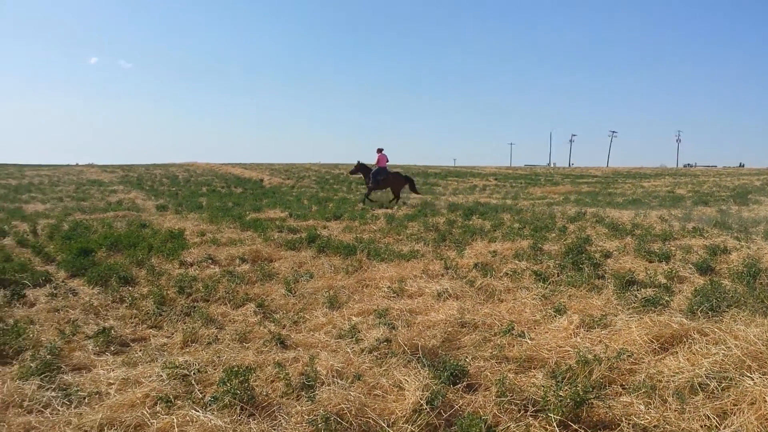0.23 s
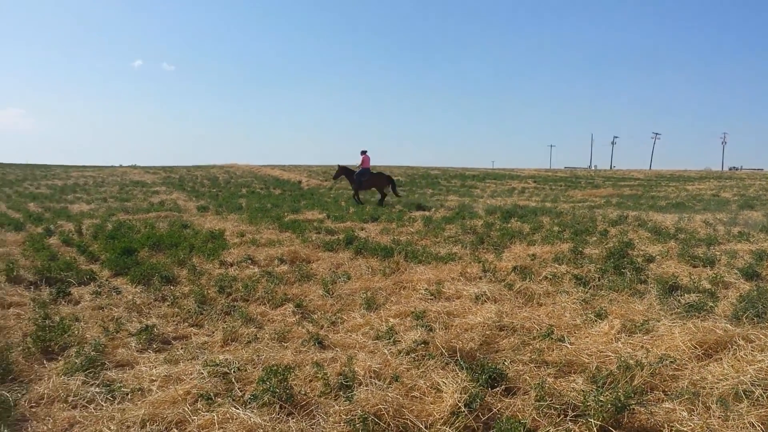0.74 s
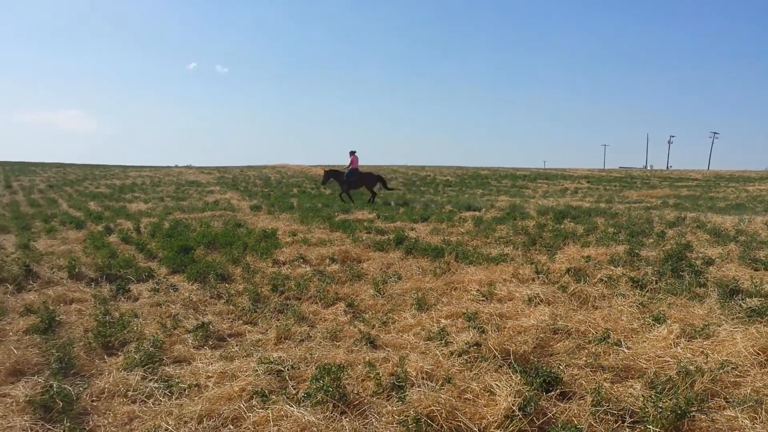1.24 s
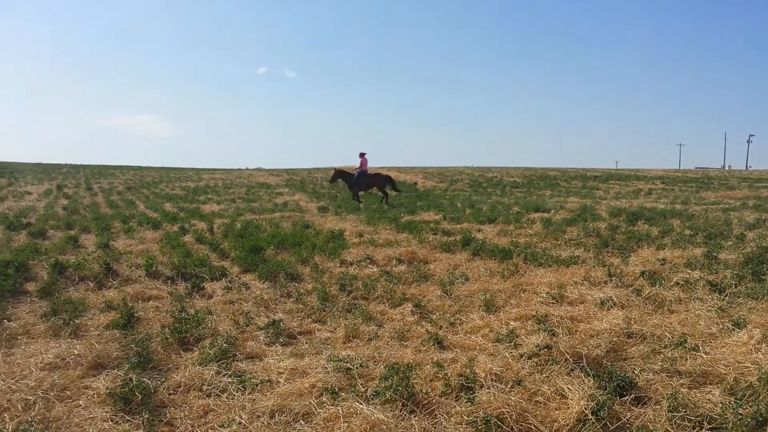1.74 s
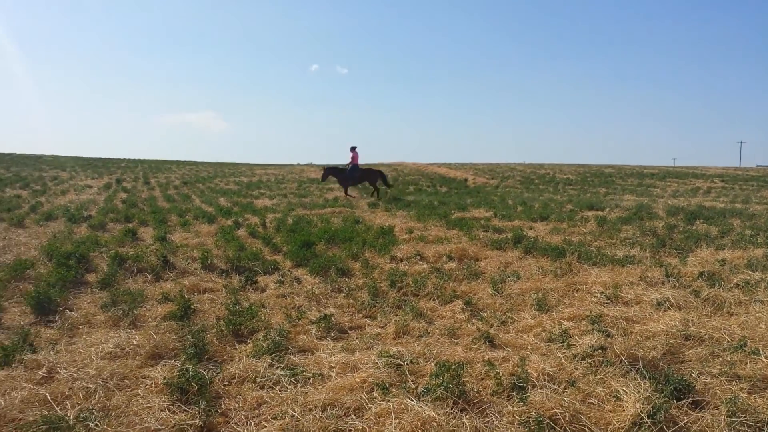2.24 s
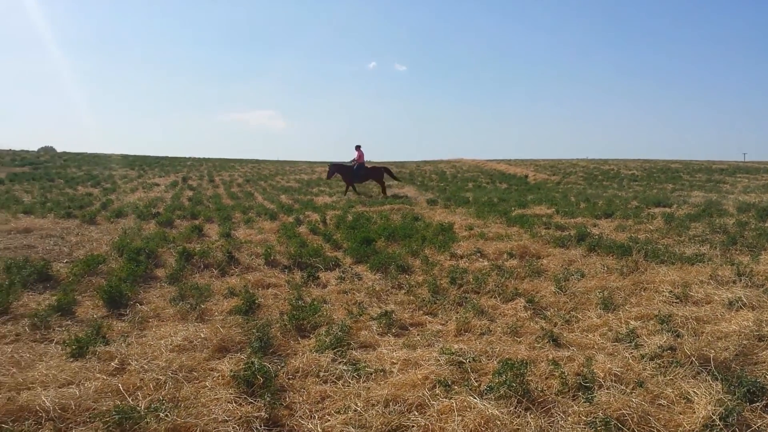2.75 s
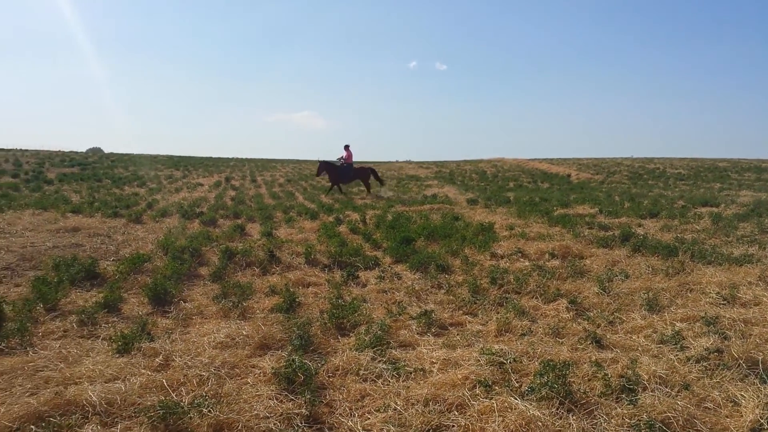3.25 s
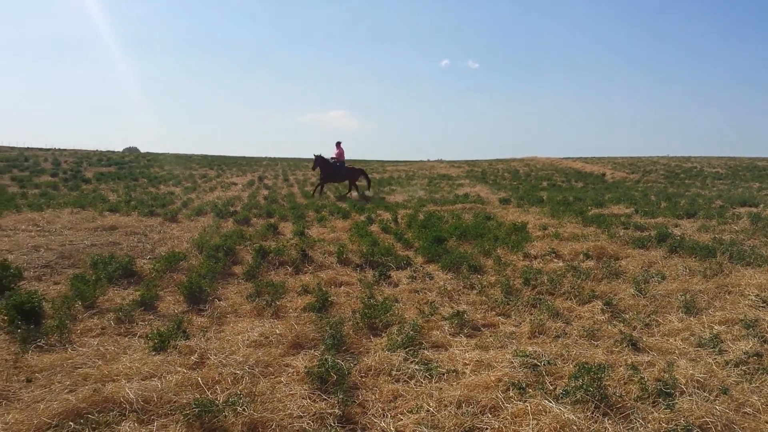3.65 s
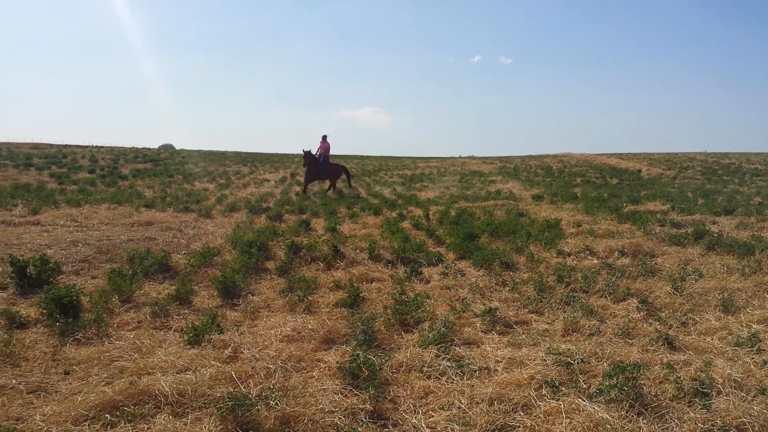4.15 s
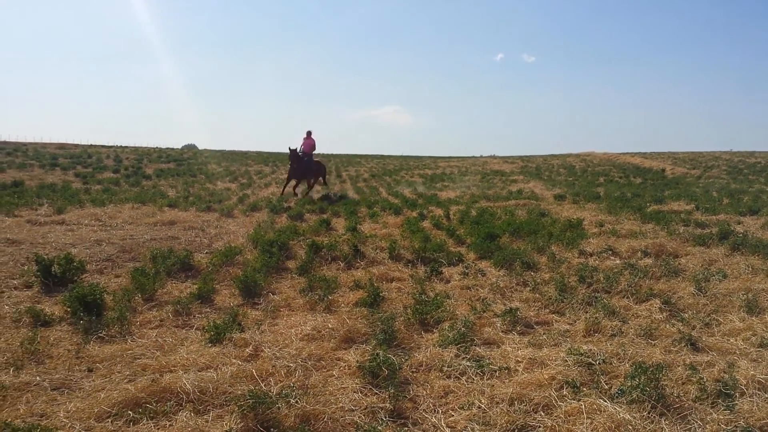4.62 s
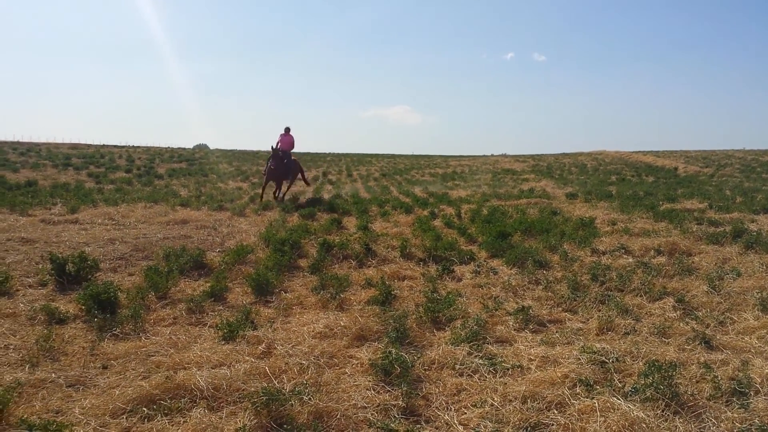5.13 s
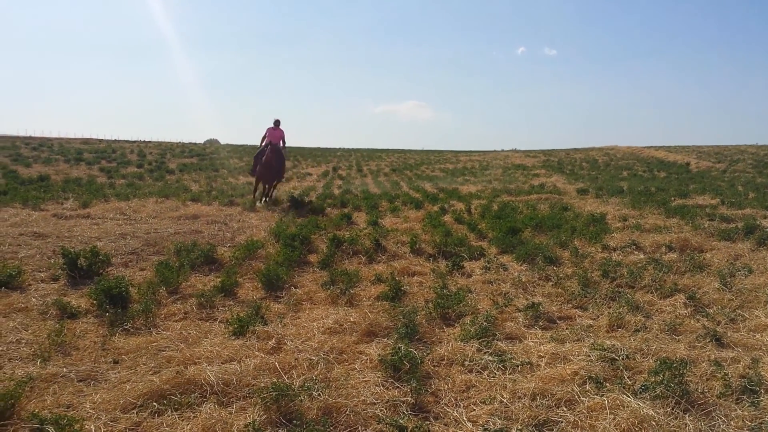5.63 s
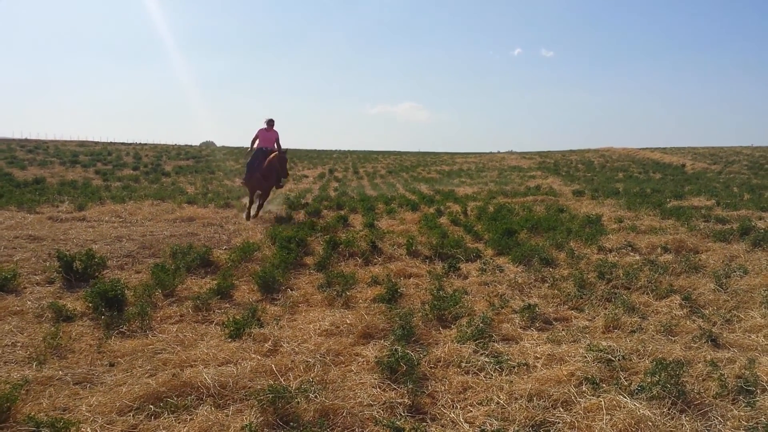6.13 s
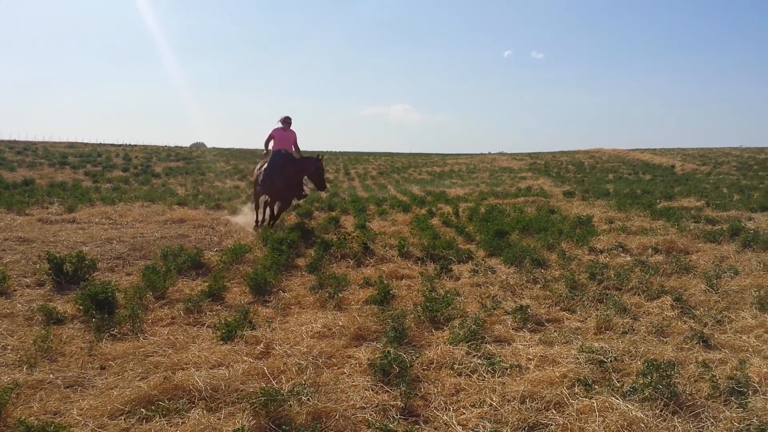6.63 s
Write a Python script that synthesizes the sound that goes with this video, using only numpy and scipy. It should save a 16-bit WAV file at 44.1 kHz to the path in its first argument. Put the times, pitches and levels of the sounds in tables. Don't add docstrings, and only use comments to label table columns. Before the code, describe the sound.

A horse canters through dry stubble, legs swishing and stalks crackling, snorting rhythmically each stride while wind buffets the microphone with low thuds.

```python
import sys
import numpy as np
from scipy import signal
from scipy.fft import rfft, irfft, next_fast_len
from scipy.io import wavfile
from scipy.ndimage import uniform_filter1d, map_coordinates

SR = 44100
rng = np.random.default_rng(int(sys.argv[2]) if len(sys.argv) > 2 else 0)


def unload_wav(signal):
    wavfile.write(
        sys.argv[1],
        SR,
        np.round(np.clip(np.atleast_2d(signal).T, -1, 1) * 32767).astype(np.int16),
    )


def field_ratio(decibels):
    return 10 ** (np.asarray(decibels, dtype=float) / 20)


N = 303496
T = np.arange(N) / SR
LONG = next_fast_len(N)
HZ = np.fft.rfftfreq(LONG, 1 / SR)

# (time [s], share head-on [0-1], lag of the left port [samples])
TURN = [
    (0, 0, 0.96),
    (3.5, 0.04, 1.7),
    (4.7, 0.61, 1.94),
    (5.05, 0.92, 1.7),
    (6.88, 1, 1.5),
]


def unit(x):
    return x / np.sqrt(np.mean(x ** 2))


def curves(rows):
    s, *columns = np.transpose(rows)
    return [np.interp(T, s, column) for column in columns]


def on_hz(hz, values):
    return np.interp(np.log(HZ + 1), np.log(hz), values)


def colour(x, hz, db):
    return irfft(rfft(x, LONG) * field_ratio(on_hz(hz, db)), LONG)[:N]


def band(x, hz, width):
    b, a = signal.iirpeak(hz, hz / width, SR)
    once = signal.lfilter(b, a, x)
    return signal.lfilter(b, a, once)


def walk(rate):
    hold = int(SR / rate)
    held = np.repeat(rng.standard_normal(N // hold + 1), hold)
    slewed = uniform_filter1d(uniform_filter1d(held, hold), hold)
    return 1.92 * slewed[:N]


def add(track, s, piece):
    i = max(int(s * SR), 0)
    track[i:i + len(piece)] += piece[:N - i]


def pops(rows):
    out = np.zeros(N)
    leans = rng.uniform(-1.74, 1, len(rows))
    for (s, db, hz, *edge_db), lean in zip(rows, leans):
        cycle = np.arange(-2 * SR / hz, 2 * SR / hz) * hz / SR
        pulse = np.exp(-(cycle / 0.52) ** 2) * np.cos(2 * np.pi * cycle + 0.95 * lean)
        if edge_db:
            u = cycle / hz
            edge = np.exp(-(u / 0.0017) ** 2) * np.cos(2 * np.pi * (330 + 0.25 * hz) * u)
            pulse = pulse + field_ratio(edge_db[0] + 2.5) * edge
        add(out, s - 2 / hz, field_ratio(db + 1.5) * pulse)
    return out


def shedding():
    # (time [s], peak level [dB], frequency [Hz], length [cycles])
    eddy_trains = [
        (4.155, -23, 133, 2),
        (4.572, -25, 87, 1.8),
        (4.815, -16.5, 119, 2.8),
        (5.164, -24.5, 132, 1.6),
        (5.636, -15.5, 129, 1.7),
        (5.874, -14, 90, 1.3),
    ]
    out = np.zeros(N)
    for s, db, hz, cycles in eddy_trains:
        u = (T - s) * hz
        out += field_ratio(db) * np.exp(-(u / cycles) ** 2) * np.cos(2 * np.pi * u)
    return out


def wind():
    # (time [s], left rumble level [dB], right rumble level [dB])
    gusts = [(0.0, -44.5, -42.5), (0.3, -39.5, -36), (0.7, -31.5, -38.5), (1.1, -39.5, -39.5),
             (1.38, -40.5, -37), (1.62, -30.5, -34), (1.9, -38.5, -42.5), (2.37, -32.5, -32),
             (2.65, -37, -38.5), (3.3, -34.5, -36), (3.65, -43.5, -39), (4.03, -31.5, -37),
             (4.27, -41, -39.5), (4.6, -33, -37.5), (5.46, -41, -39.5), (5.62, -35, -40.5),
             (5.76, -35, -41), (5.95, -32, -34), (6.3, -43, -43.5), (6.88, -39.5, -36)]
    # (frequency [Hz], level [dB])
    rumble = [(15, -34), (25, -16), (50, -2.5), (75, 1.5), (110, -0.5), (160, -9), (230, -14.5), (330, -26),
              (600, -41.5), (3000, -61)]
    # (frequency [Hz], gain [dB])
    left_tilt = [(60, 3.5), (220, 7.5), (400, 13.5), (700, -2.5)]
    # (time [s], peak level [dB], frequency [Hz], edge level [dB])
    cracks = [(0.354, -19, 135, -12), (0.451, -14.5, 174, -17), (0.488, -20, 200, -9),
              (0.531, -15, 168, -10.5), (0.536, -31, 684, 0.5), (0.546, -13, 178, -15),
              (0.657, -14.5, 206, -16.5), (0.679, -19, 148, -21), (0.778, -17.5, 119, -18),
              (0.825, -12, 128, -18), (0.842, -8.5, 131, -14), (1.041, -22.5, 190, -17),
              (1.33, -15, 109, -22), (1.491, -19, 121, -16), (1.521, -23, 138, -14), (1.595, -14, 190, -17),
              (1.608, -20, 281, -2.5), (1.646, -28, 186, -6), (1.731, -19, 172, -20),
              (1.862, -21, 180, -18), (2.098, -18.5, 220, -9.5), (2.407, -10, 220, -7.5),
              (2.484, -18, 206, -19), (2.54, -13.5, 148, -17), (2.62, -18.5, 220, -15),
              (3.06, -20.5, 107, -8.5), (3.274, -22.5, 189, -15), (3.59, -15, 197, -13.5),
              (4.029, -21, 218, -14), (4.34, -27, 167, -12), (4.628, -17, 154, -7.5),
              (4.813, -9, 130, -16.5), (5.615, -21.5, 182, -15), (5.762, -27, 188, -11),
              (5.947, -19.5, 148, -9.5), (6.047, -17.5, 183, -16.5)]
    # (time [s], peak level [dB], frequency [Hz])
    thuds_left = [(0.4, -11.5, 103), (0.515, -18.5, 152), (0.591, -28, 146), (0.721, -23, 129),
                  (0.798, -14, 154), (0.81, -10.5, 208), (0.971, -16.5, 111), (1.071, -19, 148),
                  (1.121, -18, 140), (1.47, -18, 120), (1.806, -27, 180), (1.82, -24.5, 158),
                  (2.072, -16.5, 175), (2.13, -22, 119), (2.198, -24, 105), (2.223, -21, 127),
                  (2.373, -17, 131), (2.427, -13, 158), (2.552, -13.5, 106), (2.656, -26, 154),
                  (2.736, -25, 131), (2.845, -15.5, 157), (2.961, -17.5, 195), (2.978, -23, 128),
                  (3.187, -27, 164), (3.562, -23, 162), (3.816, -19, 147), (3.913, -24.5, 139),
                  (3.958, -12.5, 161), (4.011, -26, 172), (4.059, -20.5, 132), (4.257, -22.5, 138),
                  (4.442, -20.5, 108), (4.471, -16, 105), (4.5, -23.5, 107), (4.519, -21, 151),
                  (4.761, -27, 138), (4.857, -12.5, 193), (4.944, -14, 145), (4.975, -21, 139),
                  (5.302, -16.5, 125), (5.54, -18, 200), (5.807, -19, 145), (5.896, -14.5, 158),
                  (5.926, -22, 157), (5.958, -15, 113), (6.091, -20.5, 158.5), (6.53, -39, 330),
                  (6.57, -31, 331), (6.605, -31, 328)]
    # (time [s], peak level [dB])
    thuds_right = [(0.787, -17), (0.814, -15), (1.621, -23), (1.698, -16), (2.158, -21), (2.231, -26),
                   (2.739, -23), (2.764, -20), (2.95, -20), (3.06, -32), (3.093, -22), (3.857, -27),
                   (3.985, -25), (4.105, -21), (4.232, -23), (4.461, -21), (4.49, -19.5), (4.57, -19),
                   (4.605, -21.5), (4.793, -27), (4.875, -22), (5.207, -27), (6.015, -22), (6.244, -24.5)]
    left_db, right_db = curves(gusts)
    hz, db = np.transpose(rumble)
    left, right = (unit(colour(rng.standard_normal(N) * field_ratio(1.9 * walk(30)), hz, db)) for _ in range(2))
    left = colour(left, *np.transpose(left_tilt))
    exposed = pops(cracks) + pops(thuds_left) + shedding()
    sheltered_hz = 100
    sheltered = pops([(s, db, sheltered_hz) for s, db in thuds_right])
    return np.array([field_ratio(left_db - 0.83) * left + exposed, field_ratio(right_db + 3.0) * right + sheltered])


def air():
    # (frequency [Hz], density [dB per Hz])
    rustle = [(250, 1.5), (620, -9), (1000, -8), (2600, -15.5), (3800, -18.5), (5600, -22), (8700, -20.5),
              (11500, -21.5), (15600, -20)]
    hz, db = np.transpose(rustle)
    mid, side = (colour(rng.standard_normal(N) * field_ratio(0.32 * walk(10.0)), hz, db) for _ in range(2))
    side = colour(side, (3000, 9000), (0, 5))
    return field_ratio(-50.5) * unit(np.array([mid + 0.58 * side, 0.98 * (mid - 0.7 * side)]))


def engine(track, orders):
    hz, db = curves(track)
    turns = 2 * np.pi * np.cumsum(hz * (1 + .002 * walk(8))) / SR
    tones = sum(field_ratio(d + 1.4 * walk(7)) * np.sin(k * turns + k * k) for k, d in orders)
    return field_ratio(db) * tones


def far_engines():
    # (time [s], firing frequency [Hz], level [dB])
    tractor = [
        (0, 43.5, -70),
        (2.2, 42.6, -67),
        (3.2, 43.6, -61),
        (3.9, 44.5, -58),
        (4.8, 44.7, -59),
        (5.6, 44.6, -63),
        (6.88, 44, -68),
    ]
    # (multiple of firing [1], level [dB])
    tractor_orders = [(4, 6), (8, -8), (9, -6), (10, -6), (11, 0), (12, -1), (13, -8), (15, -10), (16, -6)]
    # (time [s], firing frequency [Hz], level [dB])
    drone = [
        (2.7, 66, -45),
        (3.1, 67.63, -38.5),
        (5.5, 65.97, -39.5),
        (6.88, 63.73, -39),
    ]
    # (multiple of firing [1], level [dB])
    drone_orders = [(2, 0), (3, -9)]
    both = engine(tractor, tractor_orders) + engine(drone, drone_orders)
    return np.outer(field_ratio([0.5, -0.5]), both)


def swings():
    # (time [s], peak level [dB], build-up [s], dying [s])
    leg_swings = [(0.04, -49.5, 0.075, 0.16), (0.3, -48.5, 0.025, 0.06), (0.385, -46, 0.095, 0.057),
                  (0.52, -44, 0.054, 0.035), (0.6, -57, 0.036, 0.087), (0.725, -54.5, 0.06, 0.026),
                  (0.81, -52.5, 0.022, 0.054), (0.865, -46, 0.07, 0.059), (0.96, -54, 0.046, 0.036),
                  (1.05, -54, 0.22, 0.018), (1.16, -52.5, 0.024, 0.034), (1.415, -53.5, 0.031, 0.31),
                  (1.49, -48, 0.19, 0.06), (1.62, -53, 0.044, 0.041), (1.73, -47.5, 0.026, 0.025),
                  (1.83, -53, 0.034, 0.14), (2.06, -47.5, 0.1, 0.018), (1.95, -47, .04, 0.04),
                  (2.19, -44.5, 0.091, 0.12), (2.341, -46.5, 0.2, 0.065), (2.491, -39.5, 0.078, 0.079),
                  (2.59, -46.5, 0.05, 0.073), (2.7, -50, 0.032, 0.14), (2.8, -45.5, 0.08, 0.081),
                  (3.05, -41.5, 0.094, 0.12), (3.17, -47, 0.087, 0.22), (3.39, -44.5, 0.054, 0.022),
                  (3.6, -43.5, 0.092, 0.28), (3.771, -43.5, 0.31, 0.011), (3.88, -51, 0.035, 0.058),
                  (4.11, -42.5, 0.15, 0.085), (4.23, -43.5, 0.067, 0.2), (4.37, -41, 0.014, 0.032),
                  (4.45, -48.5, 0.082, 0.012), (4.68, -46, 0.14, 0.067), (4.76, -39.5, 0.22, 0.16),
                  (5.2, -42, 0.16, 0.14), (5.391, -40.5, 0.18, 0.032), (5.51, -46, 0.062, 0.032),
                  (5.701, -41.5, 0.11, 0.089), (5.771, -31.5, 0.011, 0.092), (5.811, -34, 0.055, 0.023),
                  (5.91, -42.5, 0.014, 0.02), (5.97, -47.5, 0.028, 0.41), (6.13, -40, 0.081, 0.044),
                  (6.3, -37, 0.071, 0.056), (6.38, -36.5, 0.1, 0.11), (6.46, -41, 0.11, 0.021),
                  (6.58, -47, 0.13, 0.1), (6.71, -40, 0.046, 0.13), (6.85, -31.5, 0.096, 0.14)]
    fall_db = 13
    still_db, drift_db_s = -69.5, -1
    power = field_ratio(still_db + drift_db_s * T) ** 2
    for s, db, build, die in leg_swings:
        away = np.abs(T - s) / np.where(T < s, build, die)
        power = power + field_ratio(db - fall_db * away) ** 2
    return 10 * np.log10(power)


def snaps():
    # (time [s], peak level [dB], ring frequency [Hz])
    lone_stalks = [(0.24, -27, 5560), (0.524, -27.5, 7000), (1.177, -40, 4150), (1.49, -33, 11000),
                   (2.351, -23, 5400), (2.36, -21, 5100), (2.372, -24, 6860), (2.7706, -36, 11000),
                   (2.7965, -25.5, 5000), (3.478, -25.5, 5400), (3.5962, -30, 5800), (3.7574, -33, 4750),
                   (4.3275, -24.5, 4900), (4.345, -35, 11400), (4.1091, -30, 4900), (4.3635, -32, 5500),
                   (5.3303, -32, 4950), (5.5083, -23, 5400), (5.607, -34, 11390), (5.7648, -23.5, 4900),
                   (5.9647, -19.5, 5400), (6.1215, -30, 5370), (6.2622, -32, 4760), (6.3034, -25, 5400),
                   (6.473, -39, 11400), (6.675, -24.5, 5400)]
    out = np.zeros(N)
    u = np.arange(300) / SR
    for s, db, ring_hz in lone_stalks:
        add(out, s, field_ratio(db) * np.sin(2 * np.pi * ring_hz * u) * np.exp(-u * ring_hz / 8.8))
    return np.outer([1.4, -.4], out)


def stubble():
    # (frequency [Hz], left level [dB], right level [dB])
    side_on = [(447, -47, -24), (823, -5, -9.5), (1160, -14.5, -20), (2640, -2.5, -9.5), (3730, -13.5, -43),
               (4350, -8, -8), (4760, 7.5, -8), (5100, 0.5, -8.5), (5760, 8, -1.5), (5890, -2, -4.5),
               (7530, -1.5, -7), (9760, -19, -14.5), (10900, -8.5, -8), (15300, -30, -20.5)]
    # (frequency [Hz], left level [dB], right level [dB])
    head_on = [(450, -40, -40), (750, -12, -14), (1000, -8, -12), (1300, -17, -20), (2800, -11, -18),
               (3400, -16, -19), (3720, -34, -34), (4000, -15, -21), (4800, 0, -19), (7000, -8, -13),
               (7900, -17, -14), (8200, -14, -14), (8700, -14, -14), (9250, -27, -27), (9900, -14, -22),
               (11300, -13, -17), (13300, -34, -19), (14100, -23, -19), (15500, -28, -28)]
    # (frequency [Hz], phase [rad] and coherence [0-1] side-on,
    # phase [rad] and coherence [0-1] half turned, phase [rad] and coherence [0-1] head-on)
    ports = [(600, 0, .7, 0, .8, 0, .85), (2500, -.5, .85, -.3, .85, -.1, .85),
             (3500, 0, .5, .3, .5, 1.3, .6), (4200, 1.4, .6, 1.5, .65, 2.6, .7),
             (5000, 1.5, .7, 2, .7, 3.4, .65), (7300, .9, .5, 1.9, .7, 4.2, .75),
             (7900, .7, .2, 2.2, .5, 3.4, .8), (8250, .5, .2, 2.5, .4, 3.14, .993),
             (9050, .5, .2, 2.5, .3, 3.14, .993), (9500, 1, .2, 3, .3, 4.9, .45),
             (11600, .6, .35, 3.1, .6, 6.4, .75), (13000, 1, .1, 3.3, .4, 6.6, .2),
             (15000, 1, .1, 3.1, .4, 6.28, .9)]
    # (low edge [Hz], high edge [Hz], share of the swings [1], own flicker [dB])
    registers = [
        (0, 3920, 0.61, 0.39),
        (3510, 9290, 0.89, -0.37),
        (9130, 22050, 0.89, 0),
    ]
    mean_db = -42
    shared, own = (rfft(rng.standard_normal(N) * field_ratio(1.9 * walk(1500) + 1.3 * walk(60)), LONG)
                   for _ in range(2))
    swing_db = swings() - mean_db
    gains = [field_ratio(mean_db + 3.0 + share * swing_db + flicker_db * walk(14))
             for _, _, share, flicker_db in registers]

    turned = np.clip(curves(TURN)[0], 0, 1)
    half = np.clip(np.minimum(turned * 8, 1.6 - 1.6 * turned), 0, 1)
    ahead = np.clip(1.6 * turned - .6, 0, 1)
    hz, *columns = np.transpose(ports)
    poses = [(side_on, *columns[:2], 1 - half - ahead),
             (side_on, *columns[2:4], half),
             (head_on, *columns[4:], ahead)]
    out = 0
    for response, phase, coherence, weight in poses:
        response_hz, left_db, right_db = np.transpose(response)
        alike = on_hz(hz, coherence)
        right = alike * shared + np.sqrt(1 - alike ** 2) * own
        right = right * np.exp(1j * on_hz(hz, phase))
        pair = np.array([shared * field_ratio(on_hz(response_hz, left_db)), right * field_ratio(on_hz(response_hz, right_db))])
        parts = [irfft(pair * ((HZ >= low) & (HZ < high)), LONG)[:, :N] for low, high, _, _ in registers]
        swish = sum(gain * part for gain, part in zip(gains, parts))
        out = out + weight * swish / np.std(parts[1][0]) * 1.113
    return out + snaps()


def flaps():
    # (time [s], peak level [dB], brightness [dB])
    hard_flaps = [(3.87, -27.5, -8), (3.904, -30, -3.5), (3.942, -27.5, -14), (4.409, -29, -5.5),
                  (4.44, -23, -11), (4.474, -24.5, -7.5), (4.517, -33.5, -10), (4.899, -45, 4),
                  (4.945, -28.5, -4.5), (4.977, -21.5, -9), (5.009, -21.5, -12.5), (5.048, -31.5, -8),
                  (5.482, -23.5, -11), (5.512, -22.5, -7.5), (5.543, -24.5, -5), (5.585, -34, -7),
                  (6.01, -26.5, -5), (6.04, -18.5, -7.5), (6.074, -24.5, -5.5), (6.115, -40.5, -1),
                  (6.534, -26.5, -3.5), (6.568, -20.5, -11.5), (6.603, -23, -8), (6.637, -26, -8.5)]
    # (time [s], peak level [dB], brightness [dB], length [ms])
    light_flaps = [(0.088, -44, -15, 37), (0.139, -46.5, -28, 81), (0.599, -54, 4, 72),
                   (0.634, -46.5, 2, 72), (0.685, -50.5, -2.5, 40), (1.145, -35, -7, 38),
                   (1.167, -52.5, 18.5, 15), (1.178, -46, 18, 10), (1.286, -42, 7, 30),
                   (1.306, -35.5, 1, 26), (1.322, -32.5, 0, 21), (1.347, -35, -2.5, 41),
                   (1.373, -32.5, -25, 24), (1.391, -34, -8, 27), (1.41, -52, -9, 12),
                   (1.712, -34.5, -6, 26), (1.73, -40.5, -13, 28), (1.756, -37.5, -11, 30),
                   (1.795, -47, 2, 79), (2.2, -45.5, 6.5, 62), (2.263, -40.5, 3, 50),
                   (2.289, -25, -0.5, 29), (2.318, -21, -3, 32.4), (2.353, -23.5, -1.5, 29),
                   (2.373, -33, -18, 14), (2.392, -29, 1.5, 30), (2.437, -32.5, -20, 20),
                   (2.5, -49.5, 14, 20), (2.943, -29, -2.5, 26), (2.971, -23.5, -2.5, 30),
                   (3.002, -27.5, -4.5, 52), (3.04, -23.5, -44, 27), (3.385, -32.5, -7, 42),
                   (3.426, -31, -24, 28)]
    shortest_ms, weak_ms_per_db, hardest_db = 21, 0.95, -16.5
    hard = [(s, db, shortest_ms + weak_ms_per_db * (hardest_db - db), bright_db)
            for s, db, bright_db in hard_flaps]
    return hard + [(s, db, ms, bright_db) for s, db, bright_db, ms in light_flaps]


def snorts():
    # (frequency [Hz], width [Hz], level [dB])
    nose_low = [(780, 970, -15), (1104, 585, 4.5)]
    nose_middle = [(1525, 585, 0)]
    nose_high = [(2160, 410, 11.5), (2500, 320, 13), (4655, 130, 2), (5400, 560, 1)]
    # (frequency [Hz], width [Hz], level [dB])
    nose_flank = [(2200, 340, -10.5), (2560, 1300, -15.5), (4630, 810, -20), (5350, 640, -26.5)]
    # (frequency [Hz], gain [dB])
    body_dip = [(500, -19), (750, -1), (2950, -3.5), (3350, -8), (4100, -7.5), (4600, 0)]
    rough_air = rng.standard_normal(N) * field_ratio(1.8 * walk(500))
    tail = np.arange(SR // 8)
    tails = rng.standard_normal((2, SR // 8)) * np.exp(-tail / (0.021 * SR))

    gates = np.zeros((3, N))
    for s, db, ms, bright_db in flaps():
        u = np.arange(int(1.6 * ms * SR / 1000)) / (ms * SR / 1000)
        puff = np.exp(-((u - .55) / 0.34) ** 2)
        middle_db = 7 + 0.24 * bright_db - 1.38 * s
        for gate, d in zip(gates, (0, middle_db, bright_db + 2.1)):
            add(gate, s + 0.0019 - 0.56 * ms / 1000, field_ratio(db + d - 8.0) * puff)

    low, middle, high, flank = (
        unit(sum(field_ratio(db) * unit(band(rough_air, hz, width)) for hz, width, db in modes))
        for modes in (nose_low, nose_middle, nose_high, nose_flank))
    facing = np.clip((T - 3.0) / .5, 0, 1)
    bright = facing * high + (1 - facing) * flank
    direct = np.sum(gates * np.array([low, middle, bright]), axis=0)
    direct = colour(direct, *np.transpose(body_dip))
    late = map_coordinates(direct, [np.arange(N) - curves(TURN)[1]], order=3)
    field = field_ratio(-37) * signal.fftconvolve(direct[None], tails, axes=1)[:, :N]
    return np.array([field_ratio(3.0) * late, field_ratio(-0.5) * direct]) + field


def wheeze():
    # (time [s], length [s], level [dB], first frequency [Hz], last frequency [Hz], width [Hz])
    breath = (1.152, 0.062, -43, 1500, 2700, 600)
    s, length, db, from_hz, to_hz, width_hz = breath
    u = (T - s) / length
    hz = from_hz + (to_hz - from_hz) * np.clip(u, 0, 1) ** 0.6
    lowpass = signal.butter(2, width_hz / 2, fs=SR, output="sos")
    rough = unit(signal.sosfilt(lowpass, rng.standard_normal(N)))
    return field_ratio(db) * np.exp(-(2 * u - 1) ** 4) * rough * np.sin(2 * np.pi * np.cumsum(hz) / SR)


def squeak():
    # (time [s], level [dB], frequency [Hz], length [s])
    leather = (2.815, -50, 3300, .013)
    s, db, hz, length = leather
    rub = np.exp(-((T - s - length) / length) ** 2)
    return field_ratio(db) * rub * unit(band(rng.standard_normal(N), hz, 260))


def scene():
    return wind() + air() + far_engines() + stubble() + snorts() + wheeze() + squeak()


def masking(x):
    # (frequency [Hz], level against the band [dB])
    faint = [(500, -40), (1500, -18), (2800, -18.5), (4500, -19), (7000, -11), (9000, -8.5), (12500, -7),
             (14500, -9), (15500, 1)]
    size, start, width = 1024, 930, 16
    n = np.arange(2 * size) + .5
    window = signal.windows.kaiser_bessel_derived(2 * size, 4 * np.pi)[:, None]
    basis = window * np.cos(np.pi / size * np.outer(n + size / 2, n[:size]))
    lead, frames = 2 * size - start, N // size + 3
    padding = ((0, 0), (lead, (frames + 1) * size - N - lead))
    halves = np.pad([x[0] + x[1], x[0] - x[1]], padding).reshape(2, -1, size)
    lines = np.concatenate([halves[:, :-1], halves[:, 1:]], axis=2) @ basis

    power = (lines ** 2).reshape(2, frames, -1, width).mean(axis=3)
    around = uniform_filter1d(power.max(axis=0), size=13, axis=1)
    kept = np.repeat(power > around * field_ratio(2 * -13), width, axis=2)
    hz = np.arange(size) * SR / (2 * size)
    kept |= hz < 3400
    threshold = np.sqrt(power * uniform_filter1d(around, size=9, axis=0))
    middle = power[0, :, 2:9].mean(axis=1, keepdims=True) + 1e-12
    threshold = threshold * (middle / np.median(middle)) ** .3
    patches = uniform_filter1d(rng.standard_normal(around.shape), size=4, axis=0)
    patches = unit(uniform_filter1d(patches, size=2, axis=1))
    threshold = threshold * field_ratio(2 * 5.5 * patches)
    faintest = field_ratio(2 * np.interp(hz, *np.transpose(faint)))
    kept &= lines ** 2 > np.repeat(threshold, width, axis=2) * faintest
    kept &= hz < 15600

    back = (lines * kept) @ basis.T / size
    joined = (back[:, 1:, :size] + back[:, :-1, size:]).reshape(2, -1)
    mid, side = joined[:, lead - size:lead - size + N]
    return np.array([mid + side, mid - side])


def roll_off(x):
    return signal.sosfilt(signal.butter(12, 16010, fs=SR, output="sos"), x)


def record(dry):
    mix = masking(dry)
    return roll_off(mix)


dry = scene()
out = record(dry)
unload_wav(out)
```